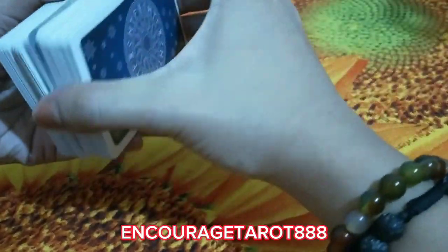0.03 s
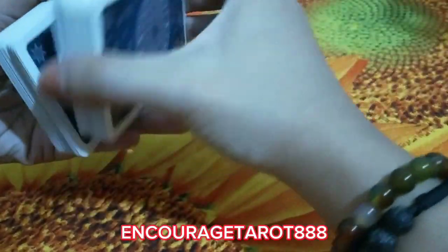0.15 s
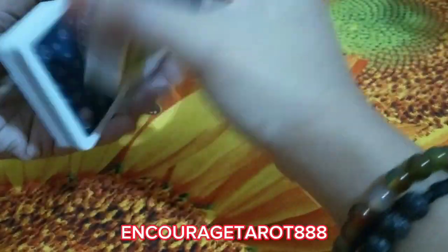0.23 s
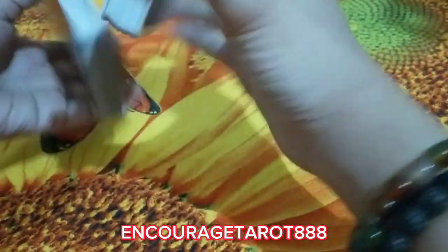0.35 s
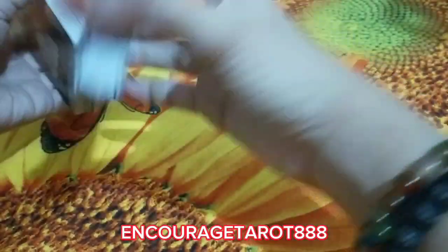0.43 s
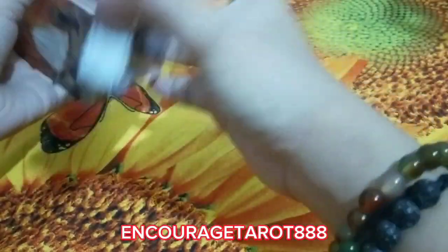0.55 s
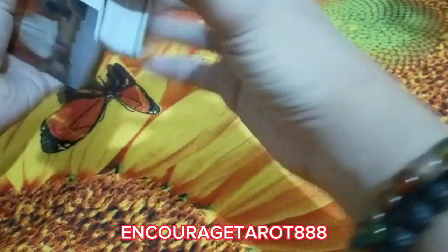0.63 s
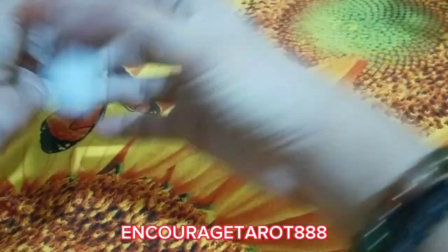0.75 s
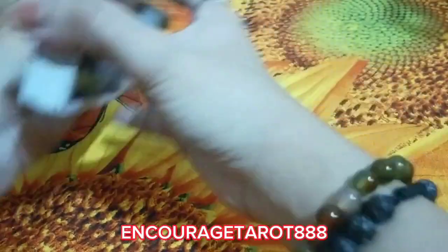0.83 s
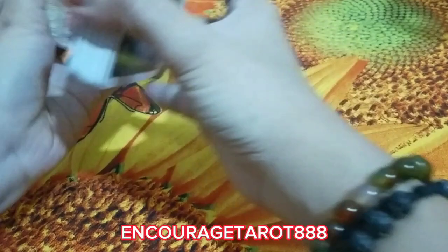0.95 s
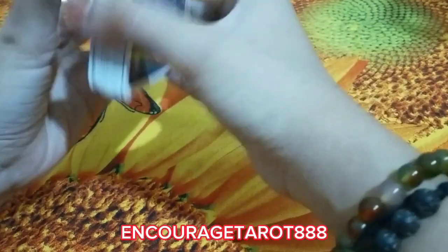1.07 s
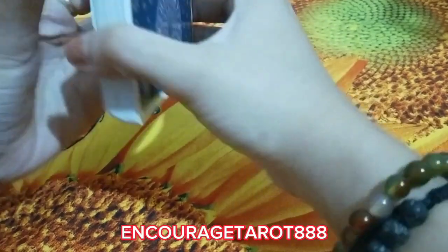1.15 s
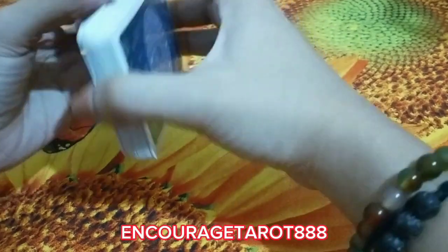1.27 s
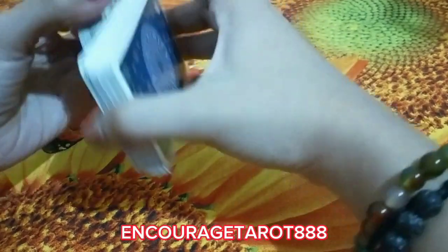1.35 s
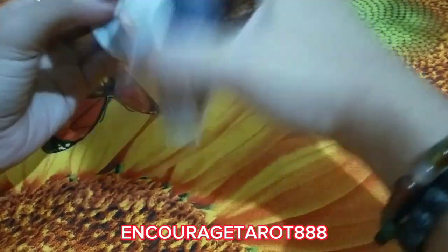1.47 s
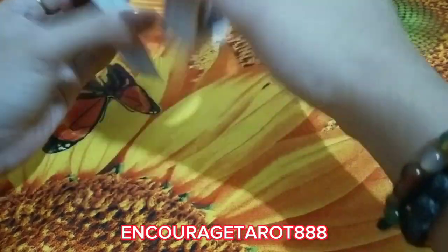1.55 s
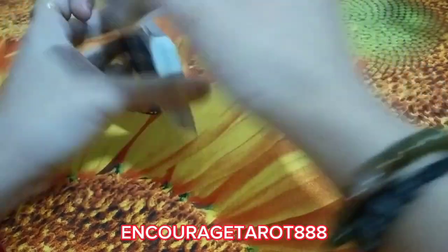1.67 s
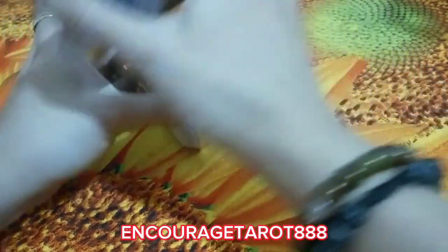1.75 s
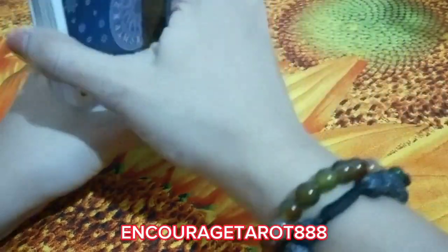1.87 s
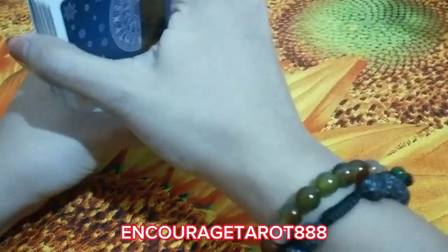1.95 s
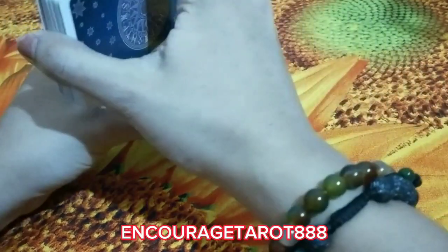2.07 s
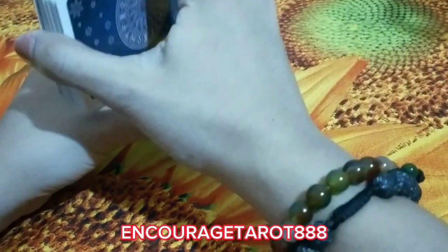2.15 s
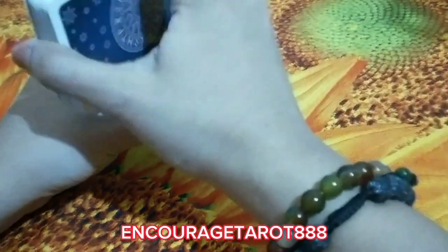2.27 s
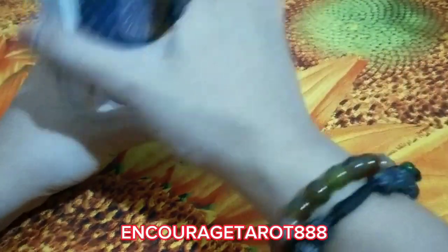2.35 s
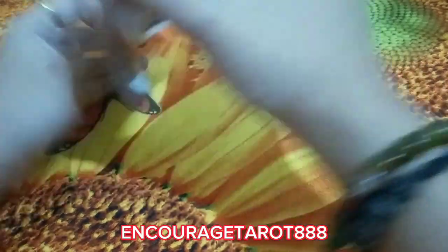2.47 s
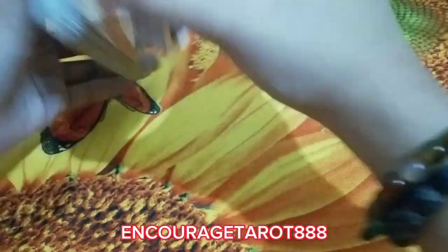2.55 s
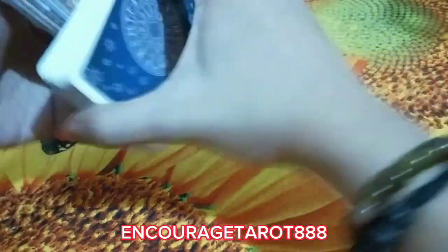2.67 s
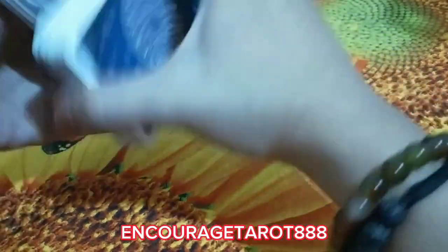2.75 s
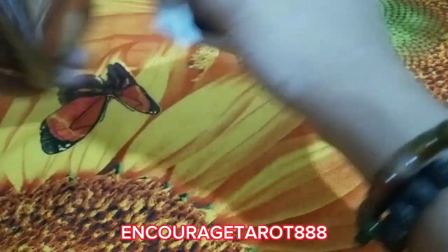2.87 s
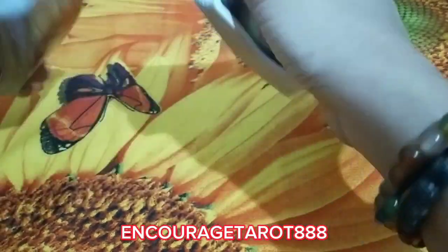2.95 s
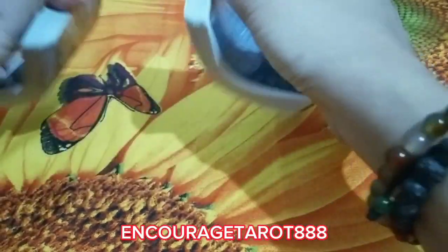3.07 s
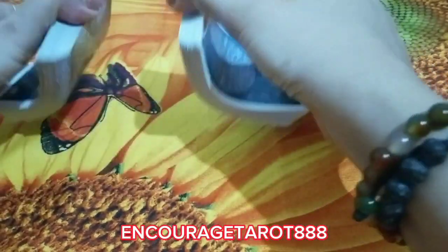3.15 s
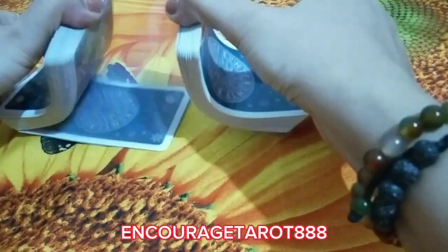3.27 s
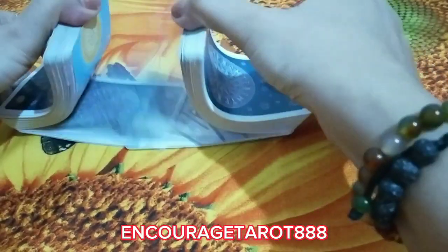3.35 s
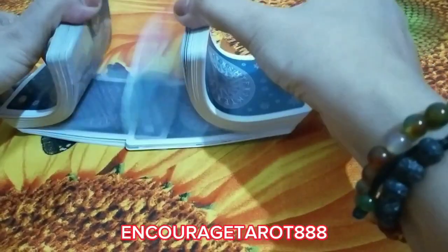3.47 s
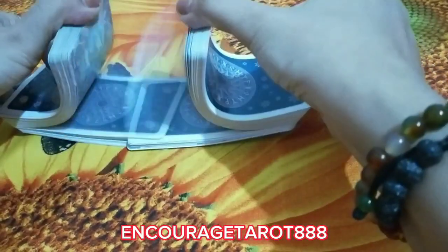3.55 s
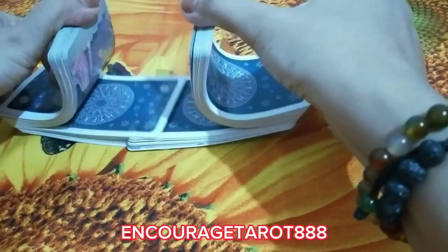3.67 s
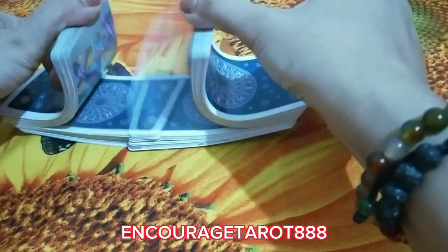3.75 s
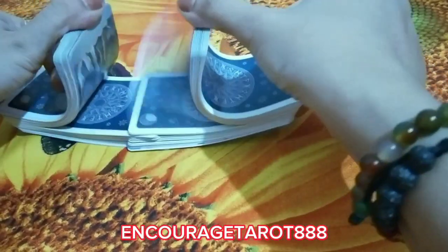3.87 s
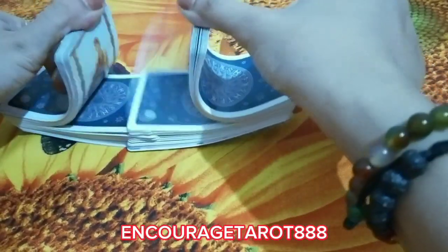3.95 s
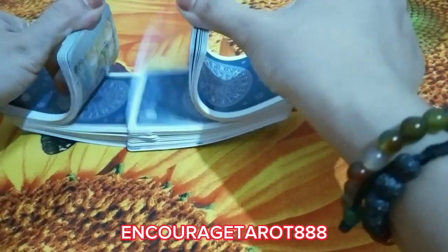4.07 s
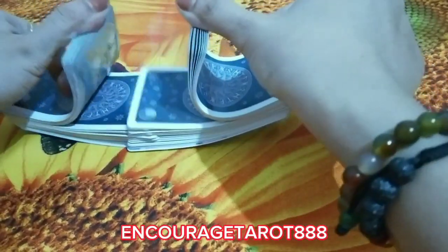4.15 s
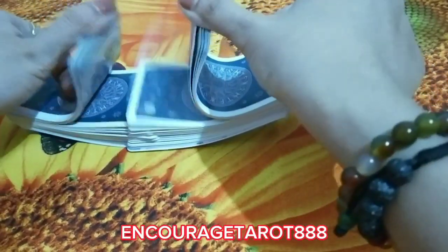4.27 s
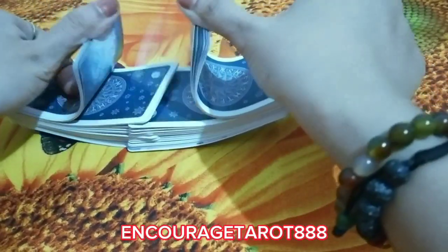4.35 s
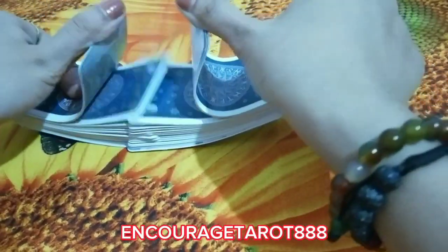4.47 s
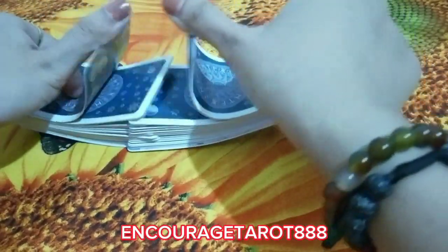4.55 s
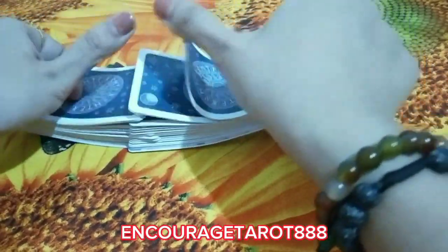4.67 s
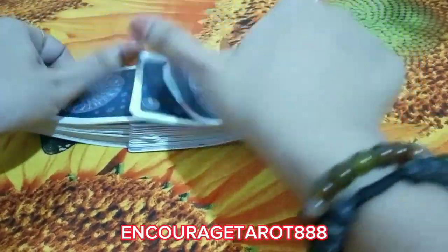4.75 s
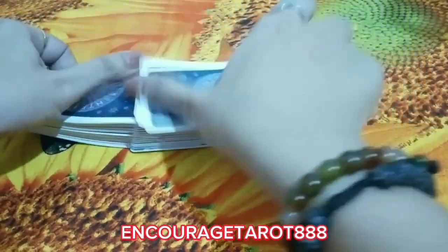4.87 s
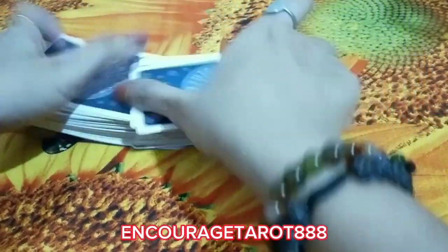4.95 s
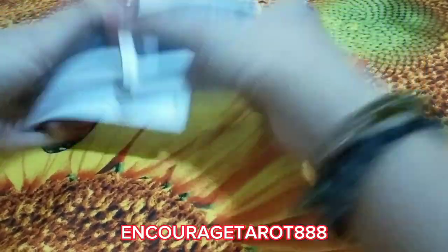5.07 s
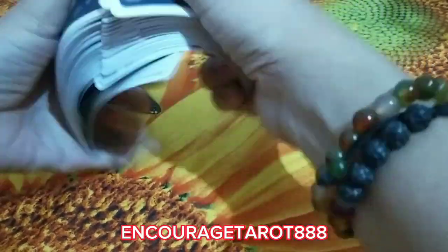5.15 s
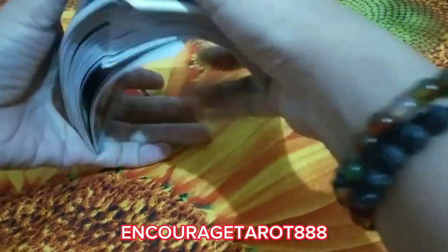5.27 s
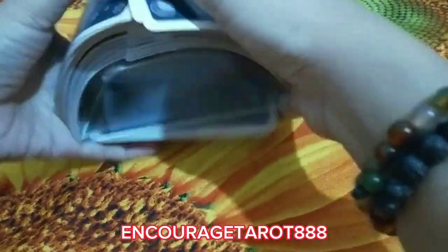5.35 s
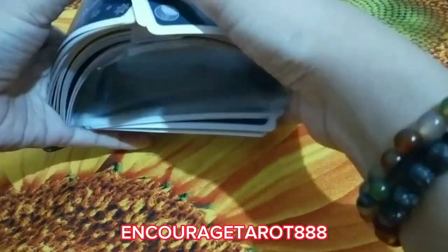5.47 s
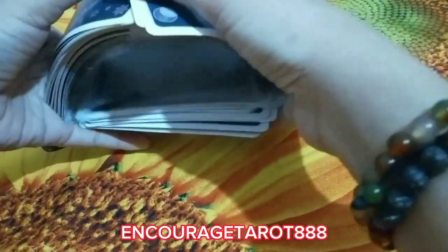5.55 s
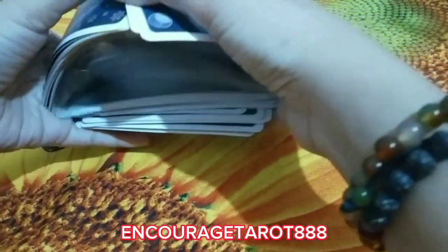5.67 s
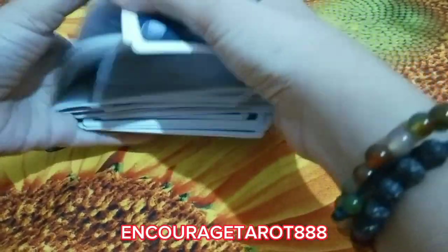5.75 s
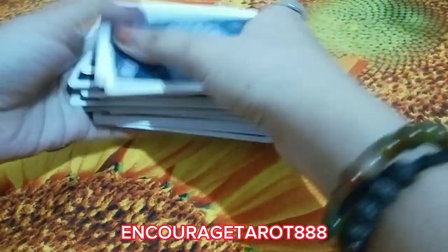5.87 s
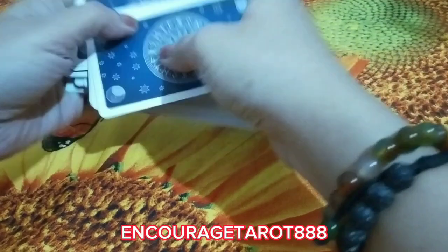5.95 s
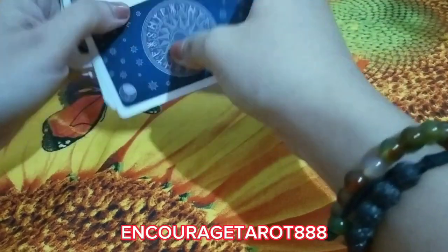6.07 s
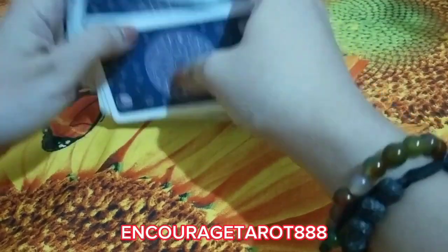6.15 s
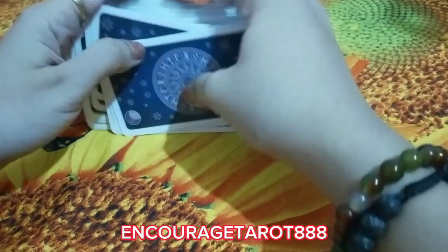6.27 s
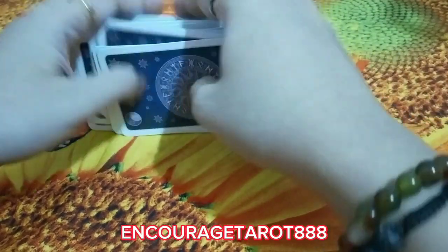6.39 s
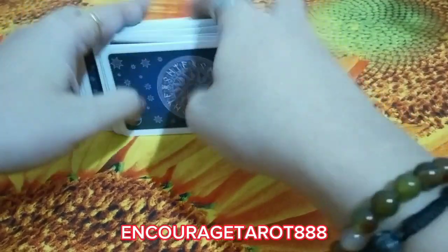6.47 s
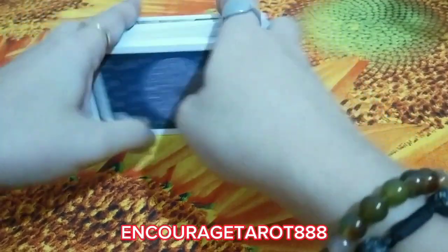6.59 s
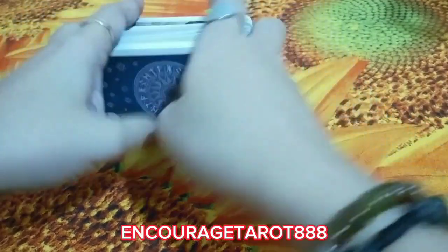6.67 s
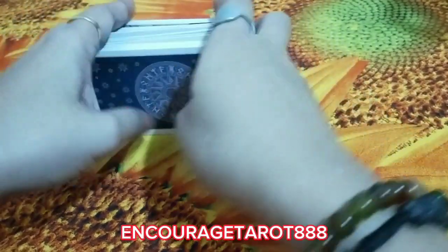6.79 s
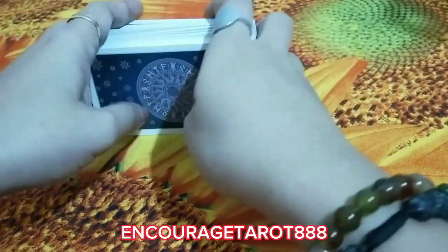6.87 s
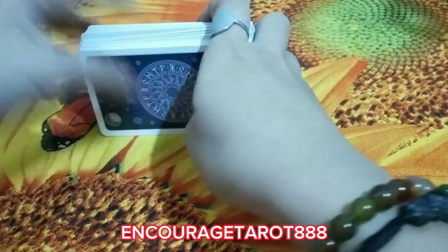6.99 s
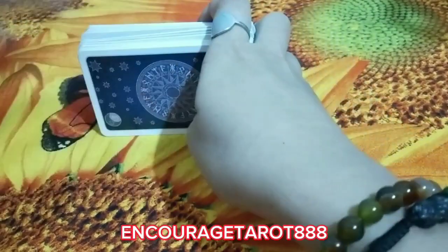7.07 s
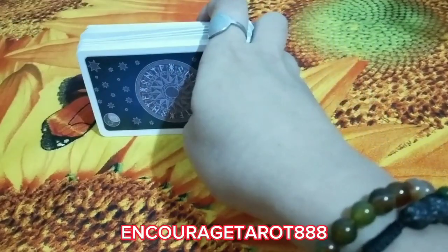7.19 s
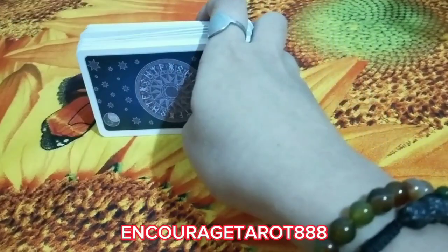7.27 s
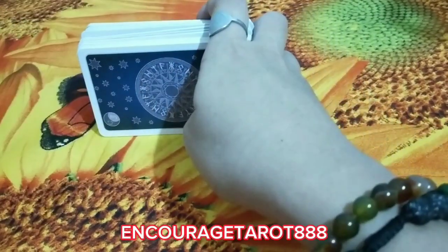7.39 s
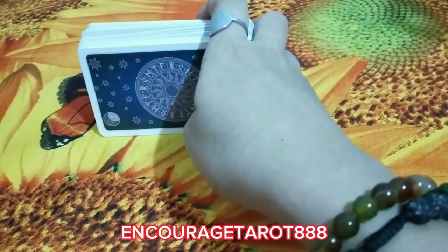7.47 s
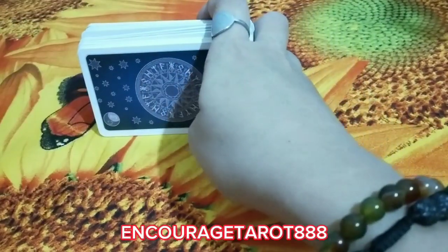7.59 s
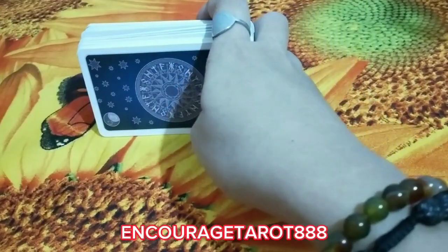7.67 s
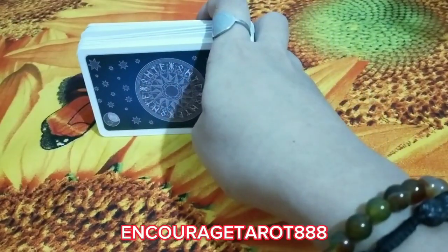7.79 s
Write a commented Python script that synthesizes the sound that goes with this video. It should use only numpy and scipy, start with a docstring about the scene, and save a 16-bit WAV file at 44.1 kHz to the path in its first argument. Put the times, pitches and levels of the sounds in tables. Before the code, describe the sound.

A deck of cards shuffled by hand very close to the microphone on a tabletop in a small, dry room. Quiet scrapes and a few low, solid knocks come first, then a sharp snap starts a dense, uneven riffle of crisp clicks and air puffs over low table rumble. A softer, faster bridge flutter follows, then a couple of taps as the deck is squared, fading to faint hiss.

```python
"""Card shuffle on a table

Hands cut, riffle, bridge and square a deck close to a phone standing on the same table.
Card edges snap (short noise bursts) with air puffs (short pulses); faces slide and scrape (gritty noise).
The deck knocks the table (short swings, thuds, ringing modes); a small room answers (decaying noise).
Under it: table rumble (low noise bands), mains hum (sines), microphone hiss (coloured noise)."""
import sys
import numpy as np
from scipy import signal
from scipy.fft import rfft, irfft
from scipy.io import wavfile
from scipy.ndimage import uniform_filter1d

SR = 44100
rng = np.random.default_rng(int(sys.argv[2]) if len(sys.argv) > 2 else 0)


def int16_out(signal):
    """Quantize to a 16-bit WAV file."""
    q = np.round(np.clip(np.atleast_2d(signal).T, -1, 1) * 32767)
    wavfile.write(sys.argv[1], SR, q.astype(np.int16))


N = 345303


def undb(db):
    """Gain of a level in dB."""
    return 10 ** (np.asarray(db) / 20)


def unit(x):
    """Scale to rms 1."""
    return x / np.sqrt(np.mean(x ** 2))


def band(x, lo_hz, hi_hz):
    """Band-pass, then scale to rms 1."""
    return unit(signal.sosfilt(signal.butter(3, [lo_hz, hi_hz], "band", fs=SR, output="sos"), x))


def highpass(x, hz):
    """First-order high-pass: the slow part leaks away."""
    return signal.sosfilt(signal.butter(1, hz, "high", fs=SR, output="sos"), x)


def curves(table, silent=None):
    """Table columns interpolated to one value per sample; silent = value outside the table."""
    s, *columns = np.transpose(table)
    return [np.interp(np.arange(N) / SR, s, c, silent, silent) for c in columns]


def response(points, size=1024):
    """Causal minimum-phase response of a (Hz, dB) spectrum, from the folded cepstrum."""
    hz, db = np.transpose(points)
    grid_hz = np.maximum(np.arange(size // 2 + 1) * SR / size, 1)
    grid_db = np.interp(np.log(grid_hz), np.log(hz), db, -70, -70)
    cepstrum = irfft(np.log(undb(grid_db)))
    cepstrum[1:size // 2] *= 2
    cepstrum[size // 2 + 1:] = 0
    return irfft(np.exp(rfft(cepstrum)))


def colour(noise, points, size=1024):
    """Noise shaped by a (Hz, dB) spectrum, rms 1."""
    return unit(signal.fftconvolve(noise, response(points, size))[:N])


def grit(count, spread_db):
    """Noise of very uneven sample sizes: many small catches, a few big ones."""
    return rng.standard_normal(count) * undb(spread_db * rng.exponential(size=count))


def walk(rate_hz):
    """Random levels held 1 / rate_hz and slewed; spread near 1, upward swings rounded off."""
    k = int(SR / rate_hz)
    steps = np.repeat(rng.standard_normal(N // k + 1), k)
    x = unit(uniform_filter1d(steps, k)[:N])
    return np.where(x > 0, 1.4 * np.tanh(x / 1.4), x)


def add(out, s, x):
    """Mix x into out from time s."""
    i = int(s * SR)
    out[i:i + len(x)] += x[:N - i]


# louder cards: t/s, edge peak level/dB, slap peak level/dB, slap f/Hz, puff level/dB, room send/dB
SNAPS = [(.1496,-42.5,-61,1260,-70,-2.5),(.4461,-46,-39,1180,-58,-10),(.4734,-50,-61,1590,-60,-17),(.8959,-38,-53,1770,-64,-16),
         (.9342,-55,-49,1740,-63,-12),(.9794,-41,-42.5,1920,-63,-10),(1.1004,-53,-51,2160,-60,-18),(1.1285,-46,-54,2150,-60,-3),(1.1555,-24,-16.5,1340,-44,-24),(1.654,-43,-70,1030,-71.5,-16),
         (1.747,-69,-35,1090,-47,-8.5),(1.7615,-68,-33,1520,-43,-36),(1.8427,-54,-44.5,960,-63,-7),(1.917,-63,-18.5,1460,-33,-33),
         (2.3015,-49.5,-19,2200,-45.5,-17),(2.7165,-37.5,-33.5,1370,-62,-12.5),(2.7636,-39,-45.5,966,-58.5,-11),(2.874,-45.5,-74.5,1690,-70,-6.5),
         (3.011,-47,-67.5,985,-73.5,-27.5),(3.2504,-40,-53,1040,-51.5,-7.5),(3.2894,-35,-33.5,986,-24,-16),(3.309,-38,-33,1070,-29.5,-16),
         (3.3488,-47,-40,920,-34,-12),(3.3934,-3,-15.5,3170,-9.5,-13.5),(3.4208,-13.5,-21.5,2520,-18,-10),(3.4801,-38,-39,1180,-37,-16),
         (3.5102,-39,-29,1310,-25,-8),(3.524,-31,-29,1240,-20,-22),(3.5481,-33,-27.5,1290,-22,-16),(3.5773,-10,-10,2830,-14.5,-16.5),
         (3.6496,-42,-26,1300,-22,-13),(3.676,-35,-39,1270,-24,-21),(3.6948,-21.5,-33,3150,-28,-6),(3.71,-12.5,-14,1440,-16,-26),
         (3.73,-17,-18,1780,-15,-20),(3.7392,-18.5,-46,1530,-44,-11),(3.7894,-9.5,-17,1300,-21.5,-16),(3.8347,-18.5,-18.5,1780,-14.5,-21),
         (3.8528,-13,-15.5,3320,-28,-12),(3.8667,-8,-10,2020,-11,-12),(3.8771,-14,-30,3170,-17,-25),(3.8876,-25,-14,1280,-14.5,-29),
         (3.947,-30,-22.5,1590,-37,-16),(3.9614,-43,-20,1600,-35,-18),(3.979,-24.5,-31,2980,-24,-5),(4.0048,-22,-19,2040,-32,-17),
         (4.0114,-13,-11,2230,-13,-18),(4.0196,-15.5,-47,2720,-37,-9.5),(4.1283,-26,-33,990,-38,-4.5),(4.14,-5.5,-8,2110,-10,-17),
         (4.1489,-15,-31,2570,-23,-9),(4.2176,-26,-19,930,-7.5,-32),(4.2314,-32,-38,1400,-28,-25),(4.2576,-25.5,-33,1320,-26,0),(4.2758,-21.5,-14.5,1710,-13,-27),
         (4.3226,-16,-16,2850,-18,-19),(4.368,-18,-22,2780,-22,-13),(4.3897,-38,-24,2790,-21,-32),(4.4615,-16.5,-18.5,1340,-29,-14),
         (4.5066,-24,-24,1280,-36,-32),(4.5174,-25,-28,1210,-17.5,-13),(4.5256,-15,-26,2280,-26,-7),(4.5555,-27,-25.5,1260,-16.5,-37),
         (4.6436,-44,-28.5,1290,-24,-22),(4.6599,-24.5,-23,2580,-34,-10.5),(4.6707,-40,-33,900,-19.5,-25),(4.6847,-10.5,-18,3020,-17,-13.5),(4.6985,-40,-28,900,-22,-22),(4.749,-25,-38,3460,-50,-30),
         (4.7866,-27,-35.5,1890,-36,-17),(4.9141,-23,-26.5,2330,-50,-13.5),(4.9437,-39,-39,1000,-29,-17),(4.9594,-38,-34,1670,-31,-8.5),(4.9813,-42,-50,900,-21,-12),(5.0895,-35,-28.5,1580,-35,-15.5),
         (5.2239,-36,-39,3130,-57,-17),(5.314,-39,-29,1290,-21,-20),(5.4456,-24,-25,3600,-42,-7.5),(5.4728,-25,-41,2430,-27,-2),
         (5.5147,-30,-52,1680,-34,-5),(5.613,-41,-25.5,1180,-28.5,-30),(5.6384,-24,-20.5,870,-22,-38),(5.71,-36,-30,1030,-20,-8),
         (5.6884,-34.5,-27.5,1700,-30,-13),(5.7285,-22,-18,1480,-17,-13),(5.7434,-25,-29,1550,-23.5,-12),(5.776,-23,-21.5,1260,-18,-6.5),(5.8004,-30,-36,1500,-27.5,-15),(5.8153,-35,-23,1130,-22,-24),(5.8317,-32,-29,2920,-18,1),
         (5.859,-22.5,-17,1340,-25,-12),(5.8697,-22,-33,1160,-17.5,0.5),(5.8917,-22,-17,1330,-17.5,-15.5),(5.9737,-37,-31,1540,-41,-22),
         (6.0583,-28,-33.5,1800,-56,-7),(6.1296,-34,-42,1340,-60,-5),(6.264,-28,-16.5,1090,-13.5,-13.5),(6.3198,-39,-25,1070,-18.5,-1.5),
         (6.3314,-46,-36,1250,-30.5,-10),(6.3426,-51,-22,1060,-20,-10),(6.351,-46,-26,1470,-15,-15),(6.3957,-57,-34,1200,-36,-17),(6.48,-54,-41,1200,-27.5,-15),(6.5024,-49,-52,1190,-32,-15),(6.5278,-39,-50,1330,-32,-8.5),
         (6.5537,-36,-47,910,-33,-5),(6.6575,-45,-44,1600,-34,-1),(6.8639,-37.5,-77,904,-71,-10),(7.034,-40.5,-53.5,1333,-76.5,-18.5),(7.2971,-38.5,-66,3530,-73.5,-15.5)]
# riffle and bridge: from t/s, to t/s, small cards per s
FLUTTERS = [(3.3, 4.75, 50), (5.6, 5.95, 110)]
# small cards: edge re slide edge hiss, slap and puff re slide rub
FLUTTER_DB, FLUTTER_SPREAD_DB, FLUTTER_ROOM_DB = (12, 7, 0.5), 4.5, -22
FLUTTER_HZ = (970, 3000)


def cards():
    """The louder cards plus a random flutter of small ones whose levels follow the sliding."""
    s, edge_db, rub_db = np.transpose(SLIDE)
    when = np.concatenate([rng.uniform(a, b, int(rate * (b - a))) for a, b, rate in FLUTTERS])
    pitch, size = rng.random(len(when)), rng.standard_normal((3, len(when)))
    level_db = [np.interp(when, s, c) for c in (edge_db, rub_db, rub_db)]
    edge, slap, puff = level_db + np.array(FLUTTER_DB)[:, None] + FLUTTER_SPREAD_DB * size
    hz = FLUTTER_HZ[0] * (FLUTTER_HZ[1] / FLUTTER_HZ[0]) ** pitch
    room_db = np.full(len(when), FLUTTER_ROOM_DB)
    return SNAPS + list(zip(when, edge, slap, hz, puff, room_db))


# card edge spectrum through the phone's port: f/Hz, level/dB
EDGE = [(2350, -35.5), (4000, -16.5), (5100, -10), (6310, -3), (8750, -16), (11800, -18.5), (15200, -11.5),
        (16000, -16.5), (16500, -23)]
# card face spectrum: f/Hz, level/dB
SLAP = [(240, -13), (400, 2.5), (453, -3), (623, -8), (980, -17.5), (1140, -10.5), (2400, -13.5),
        (2860, -10), (4000, -14), (5200, -58), (8800, -120)]
# edge brightness over time: t/s, tilt/(dB per octave)
TILT = [(0,-9),(1.2,-7),(2.8,7),(3.3,-11.5),(3.6,-17.5),(3.75,-4.5),(4.2,-4),(4.7,-2),(5.5,3),(6.1,-13.5),(6.6,11.5),(7.3,-10)]
TILT_SPREAD_DB = 4.5  # per octave
CONTACT_MS, CONTACT_SPREAD_DB = 2.72, 1


def snaps(rows, rise=0.23, slap_longer=1.196, flank_db=7, slap_rise=0.56):
    """A few ms of catches excite the bright edge and duller face; returns near sound and room feed."""
    near, feed, t = np.zeros(N), np.zeros(N), np.arange(2048) / SR
    spreads = rng.standard_normal((len(rows), 2))
    for (s, edge_db, slap_db, slap_hz, _, room_db), (a, b) in zip(rows, spreads):
        tilt_db = np.interp(s, *np.transpose(TILT)) + TILT_SPREAD_DB * a
        contact_ms = max(CONTACT_MS * undb(CONTACT_SPREAD_DB * b), .3)
        edge = response([(hz, db + tilt_db * np.log2(hz / 6300)) for hz, db in EDGE], size=512)
        # the bent face favours one pitch and falls off on both sides
        peaked = sorted(SLAP + [(slap_hz, np.interp(slap_hz, *np.transpose(SLAP)))])
        face = response([(hz, db - flank_db * abs(np.log2(hz / slap_hz))) for hz, db in peaked])
        catches, u, hit = grit(len(t), 3.58), t / (contact_ms / 1000), 0
        parts = ((edge, edge_db, u, rise), (face, slap_db, u / slap_longer, slap_rise))
        for body, db, v, swell in parts:
            envelope = (1 - np.exp(-(v / swell) ** 2)) * np.exp(-(v / 1.067) ** 1.5)
            x = signal.fftconvolve(catches * envelope, body)[:len(t)]
            hit = hit + undb(db) * x / np.abs(x).max()
        add(near, s, hit)
        add(feed, s, undb(room_db) * hit)
    return near, feed


PUFF_LATE_MS, PUFF_CYCLES = 2.1, 1.62  # puff centre after snap start; length in slap cycles


def puffs(rows, low_hz=250, negative_share=.65):
    """One-sided air pulses of random polarity, about 1 ms, as a card lands; the slow part leaks."""
    out = np.zeros(N)
    for (s, _, _, hz, db, _), chance in zip(rows, rng.random(len(rows))):
        pulse = np.hanning(int(PUFF_CYCLES * SR / hz) + 2)
        start_s = s + PUFF_LATE_MS / 1000 - PUFF_CYCLES / hz / 2
        add(out, start_s, undb(db) * np.sign(chance - negative_share) * pulse)
    return highpass(out, low_hz)


# deck or hand on the table: full swing t/s, swing level/dB, f/Hz, ring cycles, thud level/dB re swing
KNOCKS = [(0.251,-33.5,134,4.6,-25),(1.157,-5.5,659,1.3,-20.5),(1.158,-13.5,320,0.99,-22),(1.422,-33.5,75.4,0.88,-32),(1.661,-21,116,0.6,-42.5),(1.7636,-30,540,2.3,-2.5),
          (1.919,3,133.6,0.83,-23),(1.9716,-28,104,1.2,-16),(2.3049,-6.5,264,1.18,-18.5),(2.307,-8.5,131,0.69,-45.5),(2.4927,-37,108,1.7,-19),
          (2.722,-38,143.5,0.97,0.5),(2.959,-43,147,1.6,-10.5),(4,-12,162,0.45,-8.5),(4.149,-29,96.9,1.2,-10),(4.2178,-3,259,0.72,-13.5),
          (4.4,-24,123,3.3,-10.5),(4.926,-31,117,1.5,-12),(4.9654,-30,420,1.5,-2.5),(4.9886,-36,144,0.62,1.5),(5.1156,-31,114,2.3,-6.5),
          (5.2293,-27,124,0.88,-1.5),(5.3195,-31.5,121,4.3,4.5),(5.639,-14.5,580,1.08,-23),(5.7774,-9.5,265,1.36,-8),(6.272,-14,447,1.17,-13.5),
          (6.35,-26.5,122.4,1.5,-17),(7.3554,-28.5,114.5,0.95,-33)]
# table modes: f/Hz, level/dB, t60/s
TABLE = [(98.2, -10, 0.021), (146, -1, 0.082), (240.5, -15.5, 0.15), (342.8, -10, 0.14)]
SWING_S, THUD_LEAD_S = 0.013, .002  # first touch and thud start, before full swing
RING_DB = -21.5  # mode drive re swing


def knocks(quick=0.87, low_hz=40, thud_s=0.0094):
    """A soft blow swings briefly, the loose cards thud, and the table modes ring on."""
    swings, blows, thuds = np.zeros(N), np.zeros(N), np.zeros(N)
    t = np.arange(int(.25 * SR)) / SR
    for s, db, hz, cycles, thud_db in KNOCKS:
        turn = hz * (t - SWING_S)
        width = max(cycles, .2) * np.where(turn < 0, quick, 1)
        swell = np.minimum(t / 0.0024, 1) * np.exp(-(turn / width) ** 2)
        add(swings, s - SWING_S, undb(db) * swell * np.cos(2 * np.pi * turn))
        add(blows, s, undb([db + RING_DB]))
        thud = (1 - np.exp(-t / 0.0012)) * np.exp(-t / thud_s)
        add(thuds, s - THUD_LEAD_S, undb(db + thud_db) * thud)
    ring = sum(undb(db) * np.sin(2 * np.pi * hz * t) * np.exp(-np.log(1000) * t / t60)
               for hz, db, t60 in TABLE)
    ringing = signal.fftconvolve(blows, ring)[:N]
    thudding = thuds * band(rng.standard_normal(N), 220, 570)
    return highpass(swings + ringing + thudding, low_hz)


def edge_hiss(grit_db):
    """Friction noise coloured by the card edge, rms 1."""
    return colour(grit(N, grit_db), EDGE, size=512)


# card faces sliding in riffle, bridge and squaring: t/s, edge hiss level/dB, rub level/dB
SLIDE = [(3.2, -80, -75), (3.32, -77, -62), (3.45, -51, -47), (3.55, -59, -50.5), (3.87, -47.5, -47.5),
         (4.39, -45.5, -40), (4.6, -52, -56), (4.75, -51, -59), (4.95, -56.5, -58), (5.43, -50, -52.5),
         (5.62, -39.5, -46), (5.76, -39, -43.5), (5.86, -36.5, -41), (5.97, -55.5, -54), (6.11, -59.5, -70),
         (6.5, -57, -54.5), (6.77, -61.5, -73), (6.85, -65, -79.5)]


def slide():
    """Gritty friction between card faces that catches and lets go many times a second."""
    edge_db, rub_db = curves(SLIDE, silent=-120)
    catch_db = 3.1 * walk(45)
    rub = colour(grit(N, 2.9), SLAP)
    edge = undb(edge_db + catch_db + 2.0 * walk(220)) * edge_hiss(2.1)
    return edge + undb(rub_db + 1.53 * catch_db + 1.5 * walk(70)) * rub


# single cards along the deck: t/s, length/s, squeal level/dB, from f/Hz, to f/Hz,
# edge hiss level/dB, top hiss level/dB
SCRAPES = [(0.145,0.16,-74,1280,1260,-67,-72),(0.455,0.045,-41.5,1640,1690,-53,-72),(0.507,0.16,-68,1670,1770,-61.5,-57),(0.873,0.056,-56.5,1500,1700,-49,-68),(0.919,0.18,-52.5,1730,2000,-58,-75),(1.072,.07,-58,2210,2100,-61,-80),
           (1.77,0.14,-71,1470,1500,-86,-78),(1.939,0.12,-62,1930,2050,-93,-90),(2.33,0.17,-67,2030,1800,-71,-81),(2.418,0.27,-70.5,1720,1800,-63,-66.5),
           (2.747,0.1,-72,1550,1700,-76,-61),(2.85,0.088,-94,1700,1700,-78,-52.5),(2.993,0.044,-90.5,1700,1700,-80,-70),(5.16,.07,-52,2880,2800,-48,-65),(5.514,0.099,-60,2200,2010,-34.5,-50),(6.045,0.044,-48,1630,1420,-48.5,-57),(6.097,.05,-57,1246,1270,-55.5,-65),(6.322,0.047,-32,1409,1460,-62,-62),
           (6.53,0.056,-62,1262,1230,-48,-58),(6.652,0.09,-64,1610,1400,-47.5,-54),(6.805,0.17,-86.5,1900,2150,-52.5,-65),
           (7.013,0.079,-75.5,1430,1500,-56.5,-95),(7.289,0.18,-76,2030,1850,-60.5,-73.5)]
SCRAPE_ATTACK_S, SCRAPE_FALL_DB = 0.029, 16


def scrapes(width_hz=320):
    """Friction squeals in a narrow gliding band under edge hiss: quick bite, then a fall."""
    out, hiss = 0, edge_hiss(1.5) * undb(3.1 * walk(68))
    edge, top = band(hiss, 3700, 10000), band(hiss, 14300, 17000)
    lowpass = signal.butter(3, width_hz, fs=SR, output="sos")
    rough = unit(signal.sosfilt(lowpass, grit(N, 2.6)))
    grain_db = 3 * walk(110)
    for s, length, squeal_db, from_hz, to_hz, edge_db, top_db in SCRAPES:
        (hz,) = curves([(s, from_hz), (s + length, to_hz)])
        fall = [(s, -SCRAPE_FALL_DB), (s + SCRAPE_ATTACK_S, 0), (s + length, -SCRAPE_FALL_DB)]
        (db,) = curves(fall, silent=-120)
        squeal = np.sqrt(2) * rough * np.sin(2 * np.pi * np.cumsum(hz) / SR)
        friction = undb(squeal_db + grain_db) * squeal + undb(edge_db) * edge + undb(top_db) * top
        out = out + undb(db) * friction
    return out


ROOM_T60_S, ROOM_RISE_S = 0.22, 0.00067


def room(feed, damp_hz=9000, gain_db=7.0):
    """Small room: dense, slightly dull echoes that fade in fast and decay exponentially."""
    t = np.arange(int(.5 * SR)) / SR
    decay = np.exp(-np.log(1000) * t / ROOM_T60_S) * np.clip(t / ROOM_RISE_S, 0, 1)
    tail = rng.standard_normal(len(t)) * decay
    tail = signal.sosfilt(signal.butter(1, damp_hz, fs=SR, output="sos"), tail)
    return signal.fftconvolve(feed, tail / np.sqrt(np.sum(tail ** 2)))[:N] * undb(gain_db)


# table shaken by arms and cards: t/s, rumble level/dB, upper rumble level/dB
SHAKE = [(0.0, -48.5, -63), (0.67, -46, -51.5), (0.89, -46.5, -57), (1.31, -54.5, -69), (1.79, -43, -53.5),
         (2.07, -56.5, -66.5), (2.42, -49, -61), (2.75, -57.5, -73), (3.27, -53, -78), (3.49, -53.5, -54.5),
         (3.77, -44, -48.5), (4.12, -35.5, -45), (4.36, -33.5, -44), (4.69, -48.5, -53.5),
         (5.82, -52, -52.5), (6.13, -51, -60.5), (6.5, -45.5, -54.5), (6.65, -50.5, -56.5),
         (7.18, -48, -70), (7.83, -55.5, -69)]
# rumble spectrum before band-passing: f/Hz, level/dB
RUMBLE = [(32, -25.5), (55, -7.5), (97, 5), (140, 1), (234, -5), (269, -10.5), (347, -14.5), (498, -31.5),
          (584, -43), (700, -42.5), (910, -79), (1540, -120)]
# one deep sway of the table: t/s, level/dB
SWAY = [(0.23, -70), (0.33, -42.5), (0.9, -42.5), (1.0, -70)]


def shake():
    """Low table vibration carried into the phone: two unsteady rumble bands and a deep sway."""
    rumble_db, upper_db = curves(SHAKE)
    (sway_db,) = curves(SWAY)
    rumble = colour(rng.standard_normal(N), RUMBLE, size=8192)
    low, upper = band(rumble, 33, 190), band(rumble, 230, 520)
    sway = undb(sway_db) * band(rng.standard_normal(N), 25, 36)
    return undb(rumble_db + 4.6 * walk(14)) * low + undb(upper_db + 4.7 * walk(20)) * upper + sway


# mains partials: f/Hz, level/dB re hum level
HUM = [(50.1, -1), (351, -35.5), (450, -40.5)]
# wavering hum level: t/s, level/dB
HUM_LEVEL = [(0,-45),(.3,-62),(1.15,-67.5),(1.44,-47),(1.7,-68),(2.3,-65),(2.55,-57.5),(3.25,-49),(3.55,-72),(6.6,-59),(6.9,-49.5),(7.83,-48)]


def mains_hum():
    """Steady mains sines under one wavering level."""
    (hum_db,) = curves(HUM_LEVEL)
    t = np.arange(N) / SR
    return undb(hum_db) * sum(undb(db) * np.sqrt(2) * np.sin(2 * np.pi * hz * t) for hz, db in HUM)


# hiss spectrum: f/Hz, relative level/dB
HISS = [(290, -31), (500, -3), (829, -6.5), (958, 3.5), (1140, -6.5), (1730, -3), (2210, -4.5),
        (5270, -0.5), (6090, -5), (11300, -7.5), (15800, -9)]
HISS_DB = -67.5  # rms


def microphone_hiss():
    """Steady coloured noise of the microphone."""
    return undb(HISS_DB) * colour(rng.standard_normal(N), HISS)


PUFF_ROOM_DB, KNOCK_ROOM_DB = -18.0, -27.5  # room sends


def scene():
    """Cards, table, room and background, in mono."""
    rows = cards()
    near, feed = snaps(rows)
    air, blows = puffs(rows), knocks()
    echoes = room(feed + undb(PUFF_ROOM_DB) * air + undb(KNOCK_ROOM_DB) * blows)
    background = shake() + mains_hum() + microphone_hiss()
    return (near + air + blows + slide() + scrapes() + echoes + background)[None]


PORT_HZ, PORT_WIDTH_HZ, PORT_DIP_DB = 3800, 1600, -5.5
TOP_HZ = 15950


def record(dry):
    """The microphone port dips above the mids, peaks clip at full scale, the top is cut."""
    peak = signal.lfilter(*signal.iirpeak(PORT_HZ, PORT_HZ / PORT_WIDTH_HZ, SR), dry)
    port = dry - (1 - undb(PORT_DIP_DB)) * peak
    top_cut = signal.ellip(10, .2, 70, TOP_HZ, fs=SR, output="sos")
    return signal.sosfilt(top_cut, np.clip(port, -1, 1))


dry = scene()
out = record(dry)
int16_out(out)
```